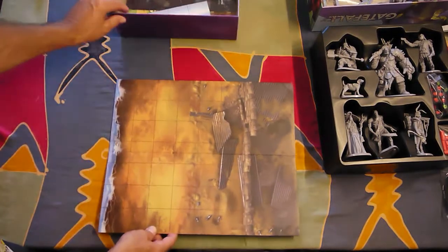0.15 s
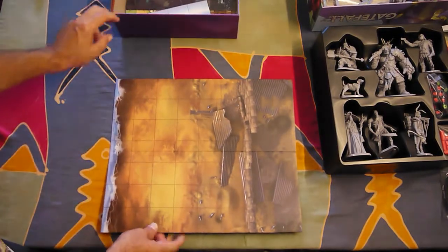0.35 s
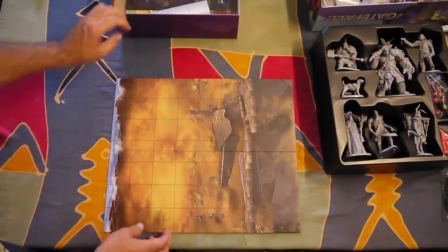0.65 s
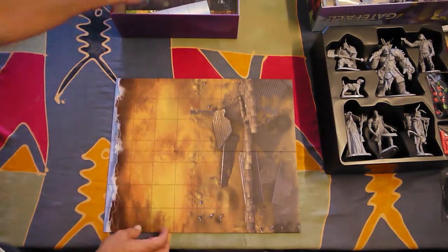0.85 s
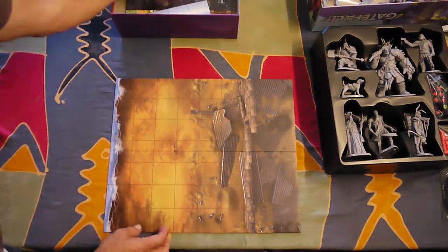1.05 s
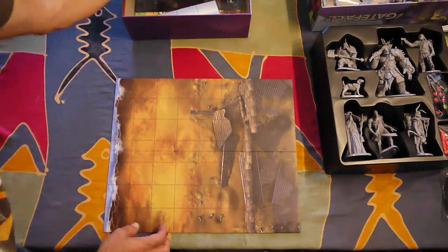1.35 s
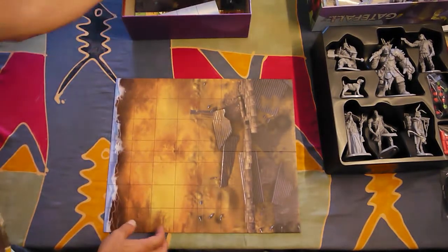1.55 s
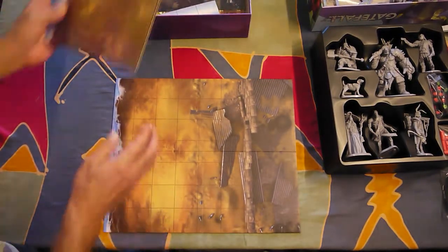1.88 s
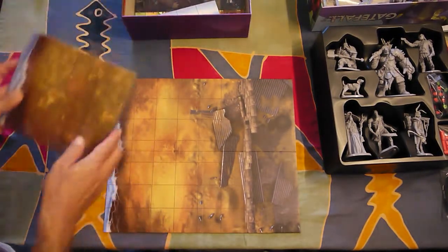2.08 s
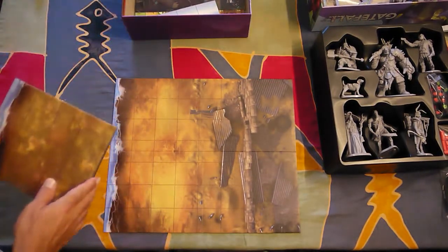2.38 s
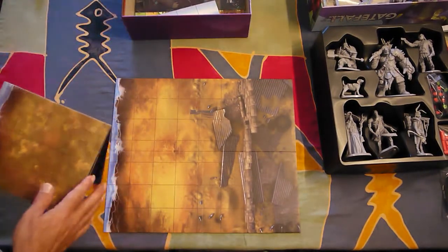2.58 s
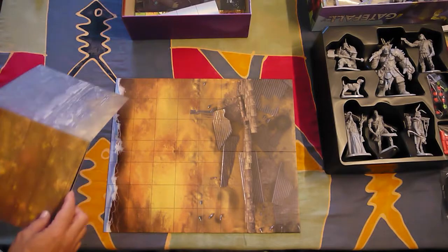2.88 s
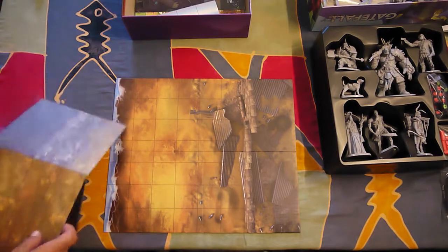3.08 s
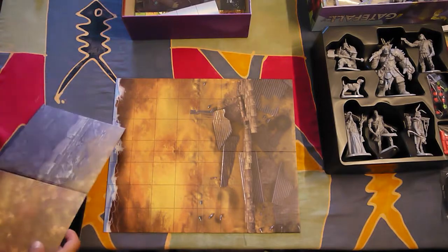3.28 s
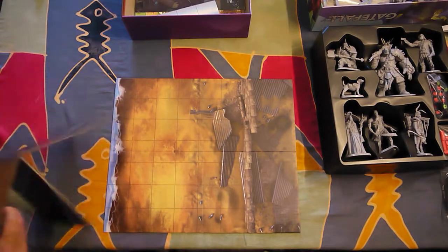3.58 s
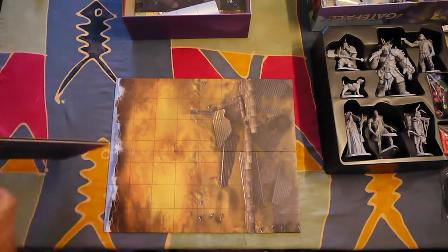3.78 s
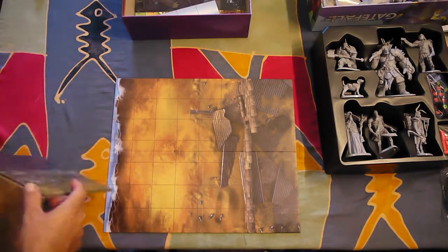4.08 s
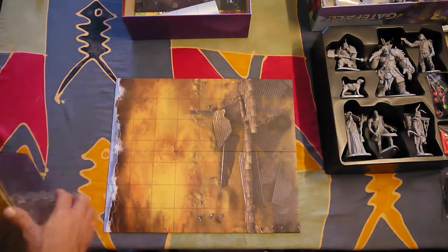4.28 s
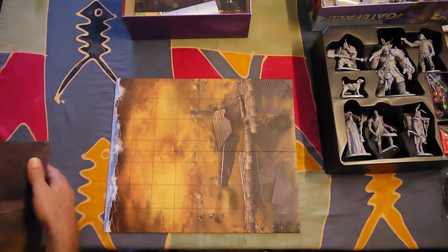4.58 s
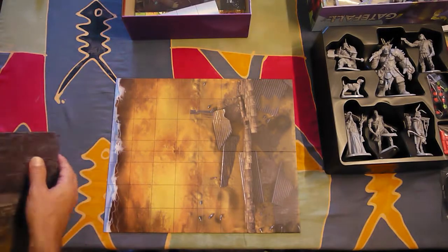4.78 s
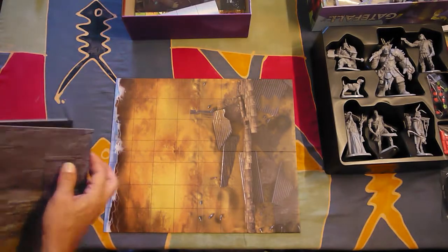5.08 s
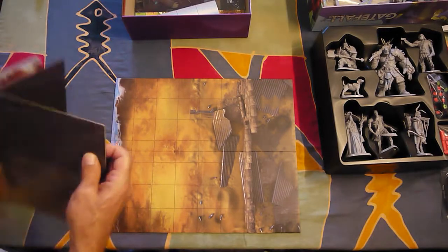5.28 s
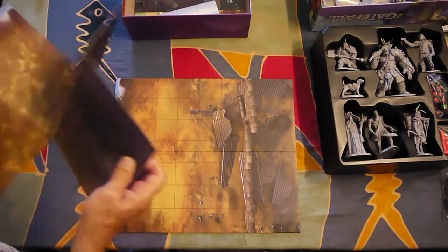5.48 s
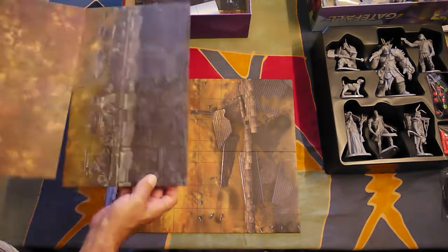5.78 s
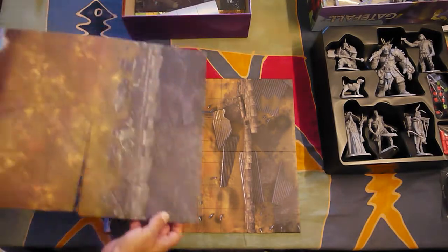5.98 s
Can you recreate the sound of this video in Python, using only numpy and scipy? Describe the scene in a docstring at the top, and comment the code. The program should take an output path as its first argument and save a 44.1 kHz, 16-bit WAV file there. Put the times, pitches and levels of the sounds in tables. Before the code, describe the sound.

Thick cardboard game boards are handled at a cloth-covered table: soft rubs, a box knock, then a loud edge clack, scraping drag and faint rustles.

```python
"""A hollow cardboard groan from a game box opens over quiet room air; soft rubs, an arm's bumps and knocks follow.
A game board is then tapped, dropped on its edge, dragged and unfolded at a cloth-covered table.
Blows mix decaying modes, noise bursts and a table thud; friction is random slips ringing modes or shaped to hiss.
Most sources get a short diffuse room tail; a dull microphone and two faint electrical tones finish the sound."""
import sys
import numpy as np
from scipy import signal
from scipy.fft import rfft, irfft, next_fast_len
from scipy.io import wavfile
from scipy.ndimage import uniform_filter1d, map_coordinates

SR = 44100
rng = np.random.default_rng(int(sys.argv[2]) if len(sys.argv) > 2 else 0)


def unload_wav(signal):
    """Save mono or channel-first audio to the path in sys.argv[1] as 16-bit WAV at rate SR, clipped to [-1, 1]."""
    wavfile.write(
        sys.argv[1],
        SR,
        np.round(np.clip(np.atleast_2d(signal).T, -1, 1) * 32767).astype(np.int16),
    )


N = 270979
TIME = np.arange(N) / SR  # s
RING = SR // 2  # samples in one half-second sound

# Bright noise of a hard contact, also of finger slips: pitch_hz, level_db (dB per Hz)
CLICK_SPECTRUM = [(100, -23.5), (700, 4), (1400, 1), (2200, 3.5), (3100, 3), (4200, -11.5), (5600, -9),
                  (7000, -9.5), (10000, -11)]


def amp(db):
    """Decibels to linear gain."""
    return 10 ** (np.asarray(db) / 20)


def unit(x):
    """x scaled to rms 1."""
    return x / np.sqrt(np.mean(x ** 2) + 1e-20)


def between(ends, share):
    """The value a share of the way from one end to the other."""
    return ends[0] + share * (ends[1] - ends[0])


def along(points, hz):
    """Values read from (Hz, value) points on a log frequency axis."""
    point_hz, value = np.transpose(points)
    return np.interp(np.log(hz + 1), np.log(point_hz + 1), value)


def coloured(x, spectrum):
    """x through a smooth (Hz, dB) response."""
    size = next_fast_len(len(x) + 2048)
    gain = amp(along(spectrum, np.fft.rfftfreq(size, 1 / SR)))
    return irfft(rfft(x, size) * gain, size)[:len(x)]


def noise(spectrum, size):
    """Coloured noise of rms 1."""
    return unit(coloured(rng.standard_normal(size), spectrum))


def wobble(rate):
    """A smooth random curve with rate knots a second."""
    knots = rng.standard_normal(int(N * rate / SR) + 4)
    return map_coordinates(knots, [TIME * rate], order=2)


def dying(t60):
    """An exponential decay that falls 60 dB in t60 seconds."""
    return amp(-60 * TIME[:RING] / t60)


def ring(modes, scatter_db, detune):
    """A body's modes after one push; grip and contact point vary each mode's strength and pitch."""
    out = np.zeros(RING)
    for k, (hz, db, t60) in enumerate(modes):
        strength, shift = rng.standard_normal(2)
        tone = np.sin(2 * np.pi * hz * (1 + detune * shift) * TIME[:RING])
        out += (-1) ** k * amp(db + scatter_db * strength) * dying(t60) * tone
    return out


def in_room(x, wet_db):
    """x plus a diffuse noise tail from the walls, which builds up after a few milliseconds."""
    # Decay of the room: pitch_hz, t60_s
    room_decay = [(100, 0.47), (450, 0.24), (2500, 0.25), (7000, 0.25)]
    # Tone of what the walls send back: pitch_hz, level_db
    wall_tone = [(80, 0), (450, -7), (1000, 2), (3000, 0), (8000, -1)]
    hz, t, bands = signal.stft(rng.standard_normal(RING), SR, nperseg=256)
    decay = amp(-60 * t / along(room_decay, hz)[:, None])
    tail = signal.istft(bands * decay, SR, nperseg=256)[1][:RING]
    tail = coloured(tail, wall_tone) * (1 - dying(0.051)) ** 2
    return x + amp(wet_db) * signal.fftconvolve(x, tail / np.linalg.norm(tail))[:len(x)]


def slips(rate, spread_db):
    """Stick and slip of paper fibres: tiny pushes of uneven size at random times, rate a second, rms 1."""
    size = amp(spread_db * rng.standard_normal(RING)) * rng.choice([-1, 1], RING)
    return unit((rng.random(RING) < rate / SR) * size)


def rubbed(modes, rate, spread_db, detune):
    """Friction ringing a set of modes, rms 1."""
    body = ring(modes, scatter_db=2.0, detune=detune)
    return unit(signal.fftconvolve(slips(rate, spread_db), body)[:RING])


def rasp(spectrum, rate, spread_db):
    """Fine slips shaped by a surface's spectrum, rms 1."""
    return unit(coloured(slips(rate, spread_db), spectrum))


def swells(rows, friction, wet_db):
    """Strokes that grow and fade evenly, each with new friction and a new room tail."""
    out = np.zeros(N + 3 * RING)
    from_peak_s = TIME[:RING] - RING / SR / 2
    for peak_s, swell_s, *controls in rows:
        stroke = np.exp(-(from_peak_s / swell_s) ** 2) * friction(*controls)
        start = max(round(peak_s * SR), 0)
        out[start:][:2 * RING] += in_room(np.pad(stroke, (0, RING)), wet_db)
    return out[RING // 2:][:N]  # puts the middle of each stroke on its peak time


def background():
    """Steady room air as coloured noise."""
    # Room air: pitch_hz, level_db (dB per Hz)
    air = [(20, -6.5), (45, -5), (100, -3), (190, 0.5), (450, 0.5), (900, -4.5), (1600, -7.5),
           (3000, -11.5), (4500, -16.5), (6000, -24.5), (10000, -24.5)]
    return amp(-62.5) * noise(air, N)


def electrical_whine():
    """Two faint high tones share one random amplitude and phase, so they flicker together."""
    # Electrical tones: pitch_hz, level_db
    tones = [(7870, -92.5), (8129, -93.5)]
    real, imaginary = rng.standard_normal((2, N))
    flicker = signal.fftconvolve(real + 1j * imaginary, dying(0.099))[:N]
    phase = np.angle(flicker)
    both = sum(amp(db) * np.sin(2 * np.pi * hz * TIME + phase) for hz, db in tones)
    return unit(np.abs(flicker)) * both


def rustling():
    """Fingers shift on the held board: faint random slips with a wandering level."""
    held_from_s, slips_per_s = 5.3, 32  # held to the end
    held = uniform_filter1d(1.0 * (TIME > held_from_s), size=4096)
    pushes = (rng.random(N) < slips_per_s / SR) * rng.uniform(-0.78, 1, N)
    crackle = coloured(pushes, CLICK_SPECTRUM)
    return held * amp(-74.5 + 4.6 * wobble(14)) * unit(in_room(crackle, wet_db=-6.5))


def bumping():
    """An arm leans on the table; its soft, slow push reaches only the frame's low modes."""
    # Soft bumps: start_s, level_db
    bumps = [(.446, -55), (0.496, -44), (0.574, -57), (0.677, -60.5), (1.951, -65)]
    # Modes of the table frame: pitch_hz, level_db, t60_s
    frame = [(108, -3, 0.3), (175, -3.5, 0.11), (208, -9.5, 0.12), (341, 2, 0.043), (442, -6.5, 0.16)]
    out = np.zeros(N + RING)
    for start_s, db in bumps:
        soft_onset = 1 - dying(0.021)
        out[round(start_s * SR):][:RING] += amp(db) * ring(frame, scatter_db=1.0, detune=0.021) * soft_onset
    return out[:N]


def ticking():
    """A nail or corner ticks on the card, a short noise burst too light to ring it."""
    # Ticks: start_s, level_db
    ticks = [(1.184, -50), (1.353, -54), (1.451, -54), (2.742, -53), (4.7, -55), (5.642, -54.5),
             (6.069, -49)]
    # Noise of a tick: pitch_hz, level_db (dB per Hz)
    nail = [(300, -18), (2000, -1), (4000, 3.5), (6000, -6), (10000, -3.5)]
    out = np.zeros(N + RING)
    for start_s, db in ticks:
        tick = amp(db) * noise(nail, RING) * dying(0.027)
        out[round(start_s * SR):][:RING] += in_room(tick, wet_db=-2.5)
    return out[:N]


def hissing():
    """Fine slips hiss at the card's face, rms 1."""
    # Hiss of the face: pitch_hz, level_db (dB per Hz)
    hiss = [(60, -33.5), (250, -2), (700, 5), (1300, 0.5), (2000, -1.5), (3100, -2.5), (4200, -6.5),
            (6000, -16.5), (10000, -17)]
    return rasp(hiss, rate=2200, spread_db=3.5)


def bending():
    """Coarse slips bend the whole board and ring its modes, rms 1."""
    # Modes of the board bending as its edge is dragged: pitch_hz, level_db, t60_s
    flex = [(286, -15.5, 0.049), (481, 0.5, 0.16), (608, 0.5, 0.089), (786, 3, 0.042), (954, -3.5, 0.071),
            (1252, -10, 0.079), (1564, -7, 0.062), (1947, -2.5, 0.02), (2610, -11.5, 0.018),
            (2996, -13.5, 0.081)]
    return rubbed(flex, rate=820, spread_db=2.0, detune=0.02)


def grinding():
    """Fine slips at the cut edge grind, with some hiss from the face beside it."""
    # Grit of the cut edge: pitch_hz, level_db (dB per Hz)
    grit = [(100, -23), (400, -29), (800, -4.5), (1250, 8), (1800, 2.5), (3200, -5.5), (4200, -12.5),
            (6000, -49), (10000, -39)]
    return rasp(grit, rate=2000, spread_db=3.5) + amp(-11.5) * hissing()


def creaking():
    """The paper hinge slips in raspy creaks, cardboard panels groan and the glossy face squeaks."""
    # Creaks of the fold: peak_s, swell_s (to 1/e), level_db
    creaks = [(3.066, 0.017, -49.5), (3.84, 0.043, -58.5), (4.774, 0.0086, -45.5)]
    # Hollow groans of rubbed or flexed cardboard, the first from the box: peak_s, swell_s (to 1/e), level_db
    groans = [(.035, 0.054, -54), (4.42, 0.087, -57.5), (5.475, 0.028, -55), (5.94, 0.078, -60)]
    # Squeaks of the glossy face as the board opens: peak_s, swell_s (to 1/e), level_db
    squeaks = [(5.69, 0.024, -57.5)]
    # Modes of the paper hinge: pitch_hz, level_db, t60_s
    fold = [(1800, -13, 0.017), (2090, 1, .035), (2820, 8.5, 0.029), (3000, -14, .018), (4110, 2, 0.01)]
    # Modes of a rubbed or flexed cardboard panel: pitch_hz, level_db, t60_s
    panel = [(298, -1.5, 0.045), (331, 6.5, 0.025), (471, -4, 0.018)]
    # Modes of the squeaking face: pitch_hz, level_db, t60_s
    gloss = [(1776, 4, .08), (2200, -0.5, 0.21), (5240, -15, .12)]

    def creak(db):
        return amp(db) * (rubbed(fold, rate=2400, spread_db=1.5, detune=0.015) + amp(-8) * hissing())

    def groan(db):
        return amp(db) * (rubbed(panel, rate=360, spread_db=2.5, detune=0.017) + amp(-5) * hissing())

    def squeak(db):
        return amp(db) * rubbed(gloss, rate=1600, spread_db=4.5, detune=0.0016)

    out = swells(creaks, creak, wet_db=-8)
    out += swells(groans, groan, wet_db=-6.5)
    return out + swells(squeaks, squeak, wet_db=-1)


def scraping():
    """Card scrapes along the box, and its stiff wall sings under the short rasp."""
    # Scrapes: peak_s, swell_s (to 1/e), level_db
    scrapes = [(1.514, 0.0087, -39), (1.541, .022, -40.5)]
    # Modes of the box wall: pitch_hz, level_db, t60_s
    box_wall = [(560, -3, 0.061), (1080, -9.5, 0.059), (1180, -15, .05), (1480, 3.5, 0.031),
                (1650, -6, 0.03), (1875, 1, 0.024), (2100, -10.5, 0.058), (3120, -5.5, 0.03)]

    def scrape(db):
        singing = rubbed(box_wall, rate=2000, spread_db=1.5, detune=0.0033)
        return amp(db) * (amp(-2.5) * singing + amp(-6.5) * hissing())

    return swells(scrapes, scrape, wet_db=-6)


def sliding():
    """Speed sets the loudness of a rub and pressure bends the board; the hand is never even."""
    # The board or a hand rubs past: peak_s, swell_s (to 1/e), speed_db, pressure (0-1)
    strokes = [(.385, 0.017, -70.5, 1), (.635, 0.034, -62.5, 0.49), (1.3, .1, -62, 0.4),
               (1.455, 0.012, -55.5, .3), (1.512, 0.0057, -39.5, 0), (2.04, 0.078, -65, 0),
               (2.52, .06, -61, 0), (3.062, .016, -49, 0.75), (3.85, 0.089, -62, 0.4),
               (4.06, 0.14, -64.5, 0.39), (4.29, 0.034, -57, 0.83), (4.44, 0.067, -64.5, 0.76),
               (4.69, 0.034, -62.5, 0.58), (4.875, 0.05, -59, 0.54), (5.03, 0.03, -59.5, 0),
               (5.27, 0.085, -60.5, .25), (5.4, 0.033, -57, 0.43), (5.495, 0.029, -58.5, 0.77),
               (5.715, 0.055, -54, 0.26), (5.78, 0.054, -60.5, 0.73), (6.085, 0.068, -61.5, 0.5)]
    # The cut edge grinds along: peak_s, swell_s (to 1/e), level_db
    grinds = [(.397, 0.028, -62), (2.515, 0.065, -57.5), (3.065, 0.015, -47.5), (3.553, 0.015, -44)]
    flex_db = (-17.5, 14)  # bending relative to the hiss, at no and at full pressure

    def rub(speed_db, pressure):
        return amp(speed_db) * (hissing() + amp(between(flex_db, pressure)) * bending())

    def grind(db):
        return amp(db) * grinding()

    uneven_hand = amp(2.8 * wobble(45))
    return (swells(strokes, rub, wet_db=-6) + swells(grinds, grind, wet_db=-5)) * uneven_hand


def dragging():
    """One effort drives the drag: the board bends, and a harder pull grinds its edge more."""
    # The board dragged on its edge: time_s, effort_db
    drag = [(3.405, -38), (3.441, -46), (3.455, -41.5), (3.469, -50.5), (3.537, -40.5), (3.611, -59.5),
            (3.669, -44), (3.74, -74)]
    equal_db = -33.5  # effort at which bending and grinding get the same gain
    grind_growth = 1.66  # dB of grinding per dB of effort
    time_s, effort_points_db = np.transpose(drag)
    effort_db = np.interp(time_s[0] + TIME[:RING], time_s, effort_points_db, right=-120)
    grind_db = equal_db + grind_growth * (effort_db - equal_db)
    out = np.zeros(N)
    out[round(time_s[0] * SR):][:RING] = amp(effort_db) * bending() + amp(grind_db) * grinding()
    return amp(1.5) * in_room(out, wet_db=-6)


def blows(hits, modes, clack_t60, click_t60, wet_db):
    """Each blow rings the struck body and the table, with clack and click noise; hardness sets the mix."""
    # Modes of the table top: pitch_hz, level_db, t60_s
    table_top = [(43.8, -20.5, .9), (58.4, -23.5, 0.23), (119, -5.5, 0.22), (164.2, -7.5, 0.23),
                 (196.4, -12.5, 0.36), (261.3, 8.5, 0.055), (281.2, -1.5, 0.16), (318, -3, 0.13)]
    # Noisy clack of card: pitch_hz, level_db (dB per Hz)
    clack_spectrum = [(60, -41), (250, 12), (600, 3.5), (800, 11), (1050, -1.5), (1500, -4.5), (2300, -2.5),
                      (3200, -12.5), (4200, -15.5), (6000, -20), (10000, -44)]
    # Levels relative to the force, for a soft and for a hard contact
    ring_db, clack_db, click_db = (0, -6), (-7.5, -4), (-31, 6)
    out = np.zeros(N + 2 * RING)
    for start_s, force_db, hardness, thud_db in hits:
        body = amp(between(ring_db, hardness)) * ring(modes, scatter_db=1, detune=.007)
        body *= (1 - dying(0.0028)) ** 2  # cardboard gives way before it rings
        clack = amp(between(clack_db, hardness)) * noise(clack_spectrum, RING) * dying(clack_t60)
        click = amp(between(click_db, hardness)) * noise(CLICK_SPECTRUM, RING) * dying(click_t60)
        thud = amp(thud_db) * ring(table_top, scatter_db=1, detune=.007)
        thud *= 1 - dying(0.15)  # the cloth softens the push
        blow = in_room(body + clack, wet_db) + in_room(click, wet_db=-5) + thud
        out[round(start_s * SR):][:RING] += amp(force_db) * blow
    return out[:N]


def box_knocks():
    """The hand knocks against the box and rings its modes."""
    # Knocks: start_s, force_db, hardness (0-1), thud_db (table, relative to the force)
    knocks = [(.998, -49.5, 0.82, 8.5), (1.024, -48, 0.74, -11), (1.095, -34, 0.56, -33),
              (1.102, -36, 0.12, -12.5), (1.355, -52.5, .5, 2), (1.432, -53.5, 0.85, -5),
              (1.5, -53.5, 1, -24)]
    # Modes of the box: pitch_hz, level_db, t60_s
    box = [(255, -3.5, 0.049), (324, 4, 0.045), (521, -6, 0.2), (662, -5.5, 0.095), (830, -10, 0.058),
           (945, -6.5, 0.13), (1103, -4.5, 0.036), (1885, -16, 0.06)]
    return blows(knocks, box, clack_t60=0.054, click_t60=0.018, wet_db=-3)


def board_hits():
    """The board, tapped, dropped on its edge and unfolded, rings its modes."""
    # Hits: start_s, force_db, hardness (0-1), thud_db (table, relative to the force)
    hits = [(2.7222, -40.5, .45, -4.5), (2.897, -50, 0.4, -26), (2.961, -51.5, 0.96, -29),
            (3.0275, -29, 0.2, -14.5), (3.1645, -28.5, 0.1, -25), (3.1738, -17, 0.8, -11),
            (3.2, -27, .5, -27), (3.3005, -29.5, 0.92, -24), (3.3985, -31.5, 0.54, -32),
            (3.4465, -41.5, 0.97, -7), (3.514, -40, 0.06, -15), (3.664, -41, 0.83, -25),
            (3.831, -50.5, 0, -12), (4.118, -48.5, 0.74, -20), (4.254, -53, 0, -2.5),
            (4.489, -50, 0.35, -11), (5.461, -50, 0, -16), (5.642, -57, .8, 4.5),
            (6.126, -41.5, 0.96, -3.5)]
    # Modes of the board on its edge: pitch_hz, level_db, t60_s
    board = [(224, -17.5, 0.096), (335, -17.5, 0.083), (442.3, 1, 0.086), (493.6, -4.5, 0.098),
             (602, 1.5, 0.079), (710, -7, 0.044), (878, -14, 0.099), (980, -23, .15), (1256, 1.5, 0.015),
             (1760, -18, 0.068)]
    return blows(hits, board, clack_t60=0.051, click_t60=0.0073, wet_db=-3)


def scene():
    """Friction, bumps, ticks and blows over the air of the room."""
    friction = amp(-2.0) * (rustling() + creaking() + scraping() + sliding() + dragging())
    return (background() + bumping() + ticking() + friction + box_knocks() + board_hits())[None]


def record(dry):
    """A dull microphone adds the electrical whine, and a sharp band limit ends the treble."""
    # Treble response of the microphone: pitch_hz, level_db
    microphone = [(6000, 0.5), (6700, -7.5), (7300, -19), (8200, -32.5), (9500, -19.5), (10500, -28.5)]
    top_hz = 10500
    x = coloured(dry[0], microphone) + electrical_whine()
    passed = np.fft.rfftfreq(N, 1 / SR) < top_hz
    return irfft(rfft(x) * passed, N)[None]


dry = scene()
out = record(dry)
unload_wav(out)
```